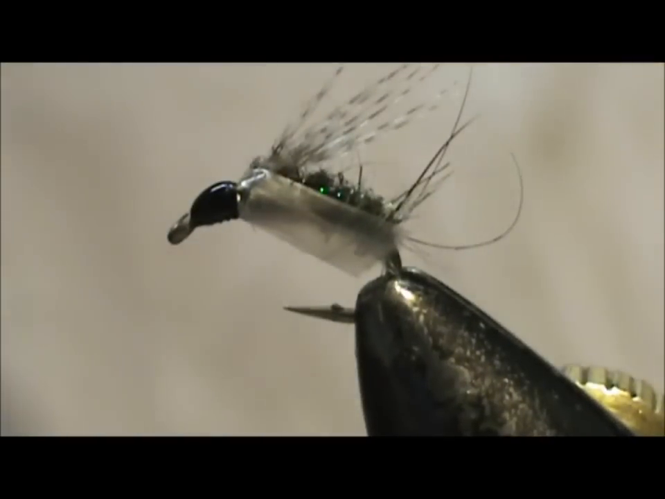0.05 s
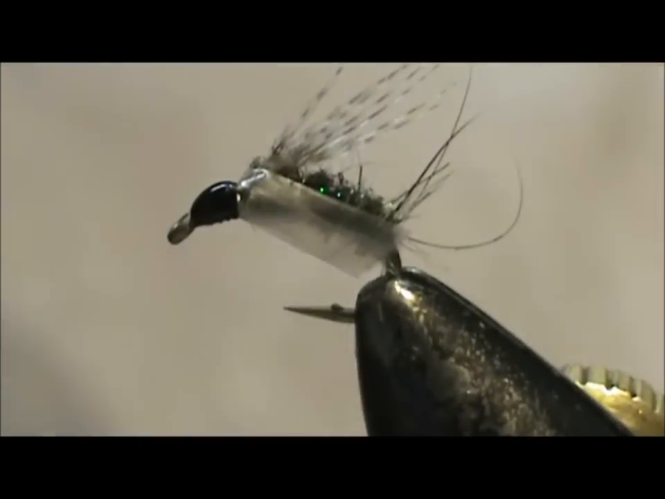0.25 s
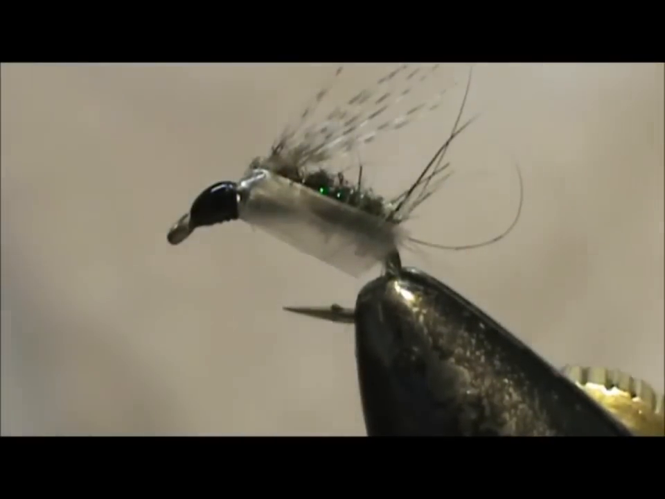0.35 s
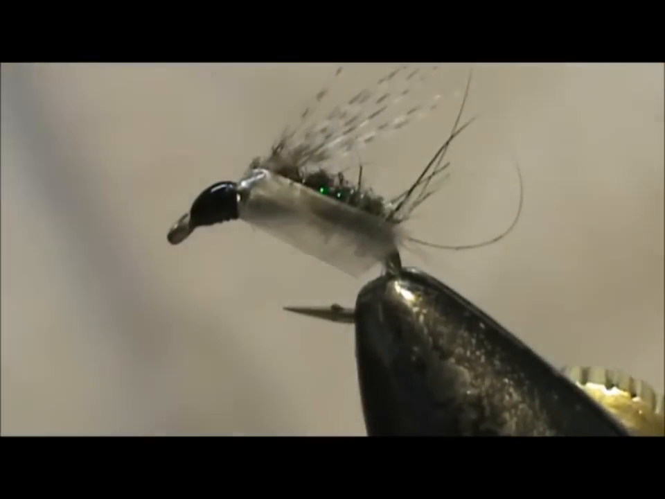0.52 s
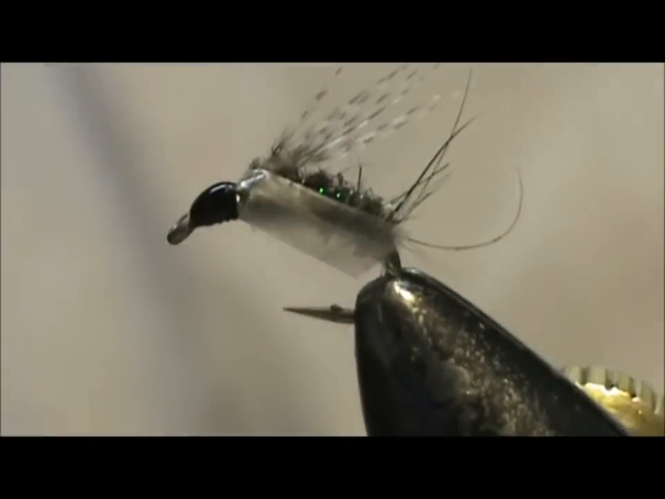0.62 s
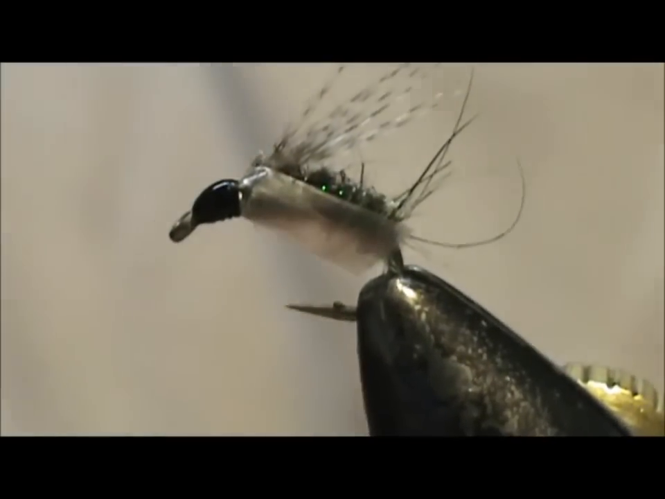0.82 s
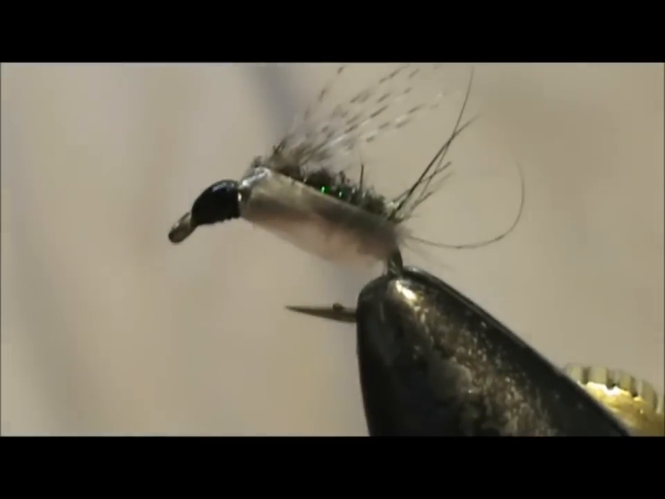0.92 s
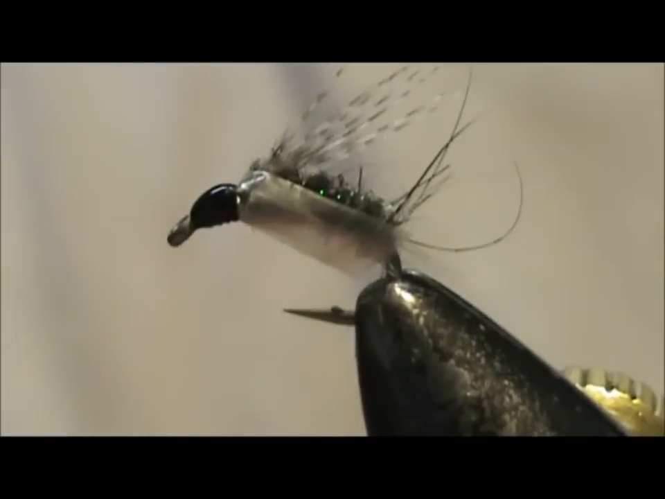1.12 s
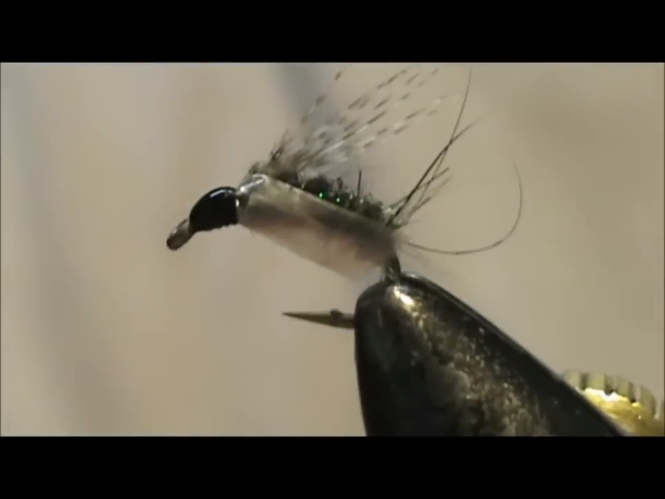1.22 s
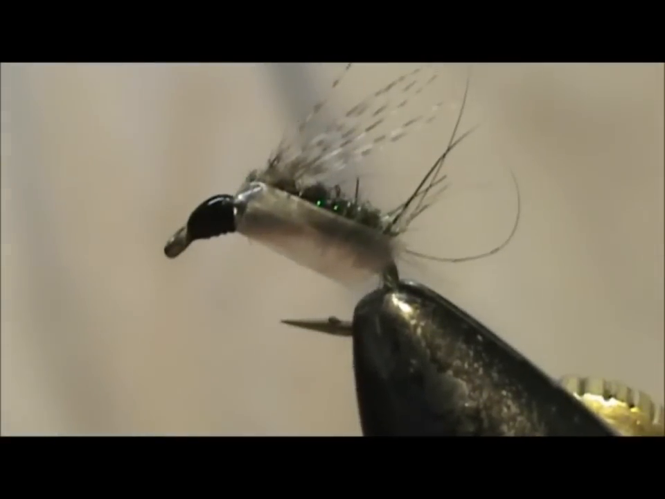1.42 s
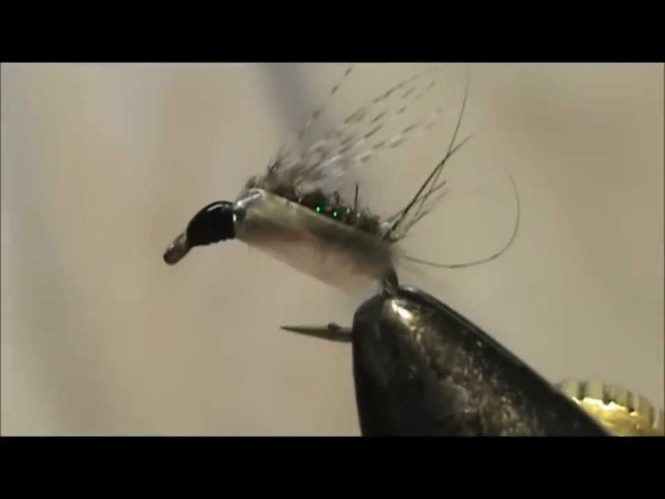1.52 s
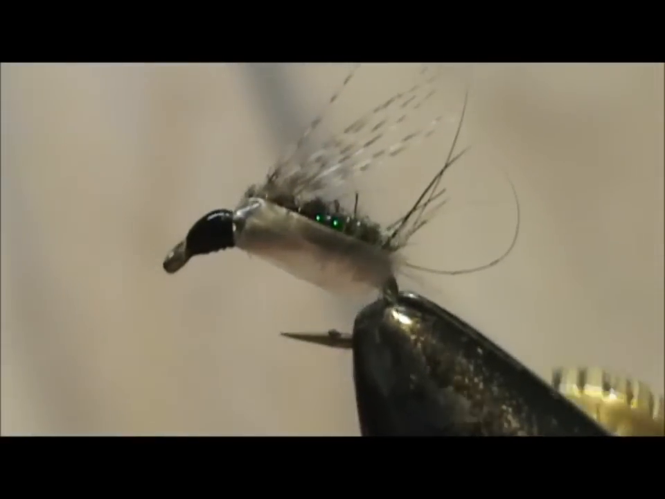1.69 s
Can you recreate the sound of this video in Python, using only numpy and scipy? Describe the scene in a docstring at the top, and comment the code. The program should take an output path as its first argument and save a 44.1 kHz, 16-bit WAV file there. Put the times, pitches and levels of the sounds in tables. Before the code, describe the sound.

One sharp metallic snap follows a light click in a quiet, faintly humming room.

```python
"""A small, quiet room with a motor hum: close-up work at a fly-tying vise.
A small tool clicks once (a tick and damped modes), then snaps: four sharp noise cracks run
into a short rattle of dense contacts and ringing metal. Later a hand rubs softly on the bench
and ends in one dull knock with a small rebound. Click, snap and knock each leave a room tail."""
import sys
import numpy as np
from scipy import signal
from scipy.fft import rfft, irfft
from scipy.io import wavfile
from scipy.ndimage import uniform_filter1d

SR = 44100
rng = np.random.default_rng(int(sys.argv[2]) if len(sys.argv) > 2 else 0)


def to_wav(sig):
    """Store sig (one row per channel, or 1-D mono) as 16-bit WAV at the path in sys.argv[1].

    Samples outside -1..1 are clipped; the rate is SR.
    """
    pcm = np.clip(np.atleast_2d(sig), -1, 1) * 32767
    pcm = np.round(pcm).astype(np.int16)
    wavfile.write(sys.argv[1], SR, pcm.T)  # frames by channels


N = 77175
T, HZ = np.arange(N) / SR, np.fft.rfftfreq(N, 1 / SR)
EDGE_HZ = 15200

# motor partials [f/Hz, rms level/dB]
HUM_PARTIALS = [(61.2, -49.5), (91.9, -60), (122.6, -53), (153.2, -54), (183.5, -63.5)]
# hand shifts [t/s, length/s, level/dB]
HAND_SHIFTS = [(1.236, 0.081, -44.5), (1.318, 0.094, -45.5), (1.391, 0.087, -41.5)]
# faint brushes, bumps, ticks, brief tool rings [t/s, length/s, level/dB, centre f/Hz, width/oct]
HANDLING_SOUNDS = [(0.084, 0.059, -50.5, 12000, 1), (0.3, 0.05, -50.5, 2120, 0.092),
                   (.5, 0.069, -53, 326, 0.054), (0.637, 0.043, -57, 274, 0.12),
                   (0.874, .24, -60, 356, 0.17), (0.939, .06, -51, 65, .3), (0.95, 0.048, -45.5, 346, 0.11),
                   (.944, .005, -51, 8000, 0.56), (0.984, 0.04, -55.5, 8500, 0.45),
                   (1.213, 0.0096, -54.5, 2440, 0.85), (1.239, 0.0058, -53, 7000, .7),
                   (1.288, 0.039, -46, 208, 0.19), (1.546, 0.0045, -53.5, 2150, 0.068)]
# knock and rebound [t/s, level/dB]
KNOCK_BLOWS = [(1.4452, -24), (1.4612, -38)]
# cracks of the snap [t/s, level/dB, decay/s, tilt/(dB/oct)]
CRACK_BURSTS = [(.3813, -3, .0006, 2.0), (.3934, -11, .0015, 1.3), (.3983, -11, .0006, .3),
                (.4060, -12, .0012, -.8)]

# modes [f/Hz, relative level/dB, t60/s]
KNOCK_BODY_MODES = [(384, -15, 0.12), (776, 0, 0.053), (1158, 3, 0.023), (1410, -2, 0.02), (1656, -5, .022),
                    (2100, -13, 0.021)]
CLICK_BODY_MODES = [(430, -24, .016), (810, -24, .02), (1130, -22, .018), (1485, -12, .02),
                    (1968, -8, .022), (2135, -4.5, .02), (2340, -10, .014), (3665, -2, .015),
                    (4170, -5, .014), (5650, -9, .007), (7980, -14, .008), (10150, -13, .005),
                    (12850, -22, .016)]
TOOL_MODES = [(2000, -43, 0.2), (2300, -52, .14), (3440, -43, 0.15), (3600, -46, 0.092)]
METAL_MODES = [(310, -4, .2), (1150, 0, .1), (1847, -1, .18), (1997, -1, .19), (2108, 0, .17),
               (2218, 2, .2), (3275, -3, .25), (3565, -5, .23), (4254, -3, .18), (4467, -5, .18),
               (4699, -4, .18), (5068, -6, .2), (7233, -7, .18), (8629, -7, .16)]

# source spectra [f/Hz, relative level/dB]
HISS_SPECTRUM = [(20, -29), (45, -6), (70, -22.5), (130, -19.5), (200, -10), (310, -22.5), (500, -20.5),
                 (1000, -24), (1900, -24), (2600, -26.5), (5000, -30), (10000, -32), (15000, -32.5)]
RUB_SPECTRUM = [(60, -10.5), (120, 3.5), (210, 3.5), (300, -1), (420, -4.5), (750, -7), (1100, -18),
                (2000, -29.5), (4000, -35.5), (14000, -31)]
TICK_SPECTRUM = [(150, -20), (600, -9), (1000, 2.5), (2000, 2.5), (4500, 5), (7000, -18), (9000, 1.5),
                 (11500, -4.5), (13500, -18)]
RATTLE_SPECTRUM = [(100, -18), (200, -21), (310, 4), (410, -16.5), (510, 7), (620, -23), (790, 5),
                   (970, -9), (1150, 4), (1400, 2.5), (1650, -2), (1880, 8.5), (2220, 4.5), (2600, 0),
                   (3300, 2.5), (4400, -3), (6000, -3), (8400, -4.5), (11200, -11), (12100, -18),
                   (12900, 3.5), (13600, -44)]
CRACK_SPECTRUM = [(100, -15), (300, -1), (620, 14.5), (1000, 7), (1600, 10.5), (2150, 7), (2900, -2),
                  (4300, 10), (6000, -11), (8000, 8), (11500, 8.5), (13000, -9), (14000, -40)]
# room and bench reflection spectra [f/Hz, relative level/dB]
KNOCK_ROOM_SPECTRUM = [(100, -7), (230, 2.5), (750, 0), (1000, -4), (1350, -3), (2000, -14), (3000, -30),
                       (14000, -28)]
CLICK_ROOM_SPECTRUM = [(150, -9.5), (330, -3.5), (620, -18), (1000, -22.5), (1500, -5.5), (1800, -2),
                       (2080, 6.5), (2450, -4), (2830, -4), (3400, 0.5), (4100, -5), (4650, -10.5),
                       (5400, -9.5), (7000, -22), (10500, -22), (13500, -54.5)]
SNAP_ROOM_SPECTRUM = [(100, -14), (310, -10.5), (450, -6.5), (780, -3.5), (970, -11.5), (1200, -3.5),
                      (1650, -0.5), (2150, 6), (2700, 2), (3400, 1), (5200, -4), (8000, -7.5),
                      (11000, -9.5), (12100, -22), (12900, -11), (13600, -53)]
BENCH_SPECTRUM = [(100, -16), (300, 2), (620, -3), (980, -5), (1150, 5), (1650, -11), (2150, 6.5),
                  (2800, -8), (4300, 4), (5700, -8.5), (8000, 7), (11000, -14), (12100, -13), (12900, 10),
                  (13600, -26)]
# room decay [f/Hz, t60/s]
ROOM_DECAY = [(150, 0.62), (500, 0.27), (1000, 0.31), (2100, 0.25), (4000, 0.31), (8000, 0.27),
              (13000, 0.32)]

# left-right coherence [f/Hz, coherence/1]
HISS_COHERENCE = [(50, 0.48), (200, 0.54), (500, 0.48), (1500, 0.18), (4000, 0.59), (8000, 0.99),
                  (14000, 0.97)]
NEAR_COHERENCE = [(200, 0.95), (700, 0.94), (2000, 0.66), (5000, 0.87), (9000, 0.87), (14000, 0.92)]
ROOM_COHERENCE = [(200, 0.98), (700, 0.78), (2000, 0.36), (5000, 0.86), (10000, 0.8)]
CRACK_COHERENCE = [(200, 0.9), (700, .92), (2000, .75), (5000, 0.62), (9000, 1), (14000, 0.89)]
BENCH_COHERENCE = [(200, 0.98), (700, 0.99), (2000, .5), (5000, 1), (9000, 1), (14000, 0.83)]
# microphone ports, left against right [f/Hz, phase lead/rad, level/dB]
MIC_PORTS = [(60, -0.3, 3), (400, -0.57, 0), (910, -0.96, 0), (1980, -0.68, 3.5), (4500, -0.34, 1),
             (9000, -0.18, 1), (14000, 0.18, .2)]


def amp(db):
    """Decibels to gain."""
    return 10 ** (np.asarray(db) / 20)


def unit(x):
    """Scale to rms 1."""
    return x / np.sqrt(np.mean(x ** 2) + 1e-20)


def lookup(table, hz, col=1):
    """Interpolate a column over log frequency."""
    points = np.array(table, float)
    return np.interp(np.log(hz + 1), np.log(points[:, 0] + 1), points[:, col])


def since(start_s):
    """Seconds since start_s, zero before."""
    return np.maximum(T - start_s, 0)


def ramp(start_s, rise_s):
    """Linear rise from 0 to 1, then held."""
    return np.minimum(since(start_s) / rise_s, 1)


def fall(start_s, decay_s):
    """1 until start_s, then exponential decay."""
    return np.exp(-since(start_s) / decay_s)


def stroke(start_s, length_s, exponent):
    """Arch of pressure."""
    return np.maximum(np.sin(np.pi * ramp(start_s, length_s)), 0) ** exponent


def drift(rate_hz):
    """Slow random wander, rms 1."""
    return unit(irfft(rfft(rng.standard_normal(N)) * np.exp(-(HZ / rate_hz) ** 2), N))


def colour(x, spectrum, size=4096):
    """Minimum-phase filter of unit energy."""
    log_gain = np.log(amp(lookup(spectrum, abs(np.fft.fftfreq(size, 1 / SR)))))
    taps = np.fft.ifft(np.exp(np.conj(signal.hilbert(log_gain)))).real[:size // 2]
    return signal.fftconvolve(x, taps[None] / np.linalg.norm(taps), axes=1)[:, :N]


def stereo_noise(coherence, raw=None):
    """White noise, or a raw pair, mixed to the given coherence; rms 1."""
    a, b = rfft(rng.standard_normal((2, N)) if raw is None else raw)
    alike = np.clip(lookup(coherence, HZ), 0, 1)
    mid, side = a * np.sqrt(1 + alike), b * np.sqrt(1 - alike)
    return unit(irfft([mid + side, mid - side], N))


def ring(start_s, modes, scatter_cycles=0):
    """Struck modes: damped sines of alternating sign, optional phase scatter."""
    t, out = since(start_s), 0
    for k, (hz, db, t60_s) in enumerate(modes):
        phase_rad = 2 * np.pi * (hz * t + scatter_cycles * rng.random()) + k * np.pi
        out += amp(db - 60 * t / t60_s) * np.sin(phase_rad)
    return (t > 0) * out


def room_tail(start_s, spectrum, rise_s):
    """Diffuse tail of a hit; each band decays at its own rate."""
    hz, t, bands = signal.stft(stereo_noise(ROOM_COHERENCE), SR, nperseg=256)
    bands *= amp(-60 * np.maximum(t - start_s, 0) / lookup(ROOM_DECAY, hz)[:, None])
    tail = signal.istft(bands, SR, nperseg=256)[1][:, :N]
    return colour(tail * ramp(start_s, rise_s), spectrum)


def hiss(level_db=-53.5):
    """Steady noise floor, strongest in the bass."""
    shaped = rfft(stereo_noise(HISS_COHERENCE)) * amp(lookup(HISS_SPECTRUM, HZ))
    return amp(level_db) * unit(irfft(shaped, N))


def motor_hum(waver_db=0.7, waver_rad=0.06):
    """Low partials, wavering slightly in level and phase."""
    out = 0
    for hz, db in HUM_PARTIALS:
        peak = np.sqrt(2) * amp(db + waver_db * drift(rate_hz=12))
        out += peak * np.sin(2 * np.pi * (hz * T + rng.random()) + waver_rad * drift(rate_hz=2.7))
    return out


def faint_handling():
    """Brushes, soft bumps, tiny ticks and brief tool rings: one arch of band noise each."""
    out = 0
    for start_s, length_s, db, centre_hz, width_oct in HANDLING_SOUNDS:
        band = np.exp(-0.5 * (np.log2((HZ + 1) / centre_hz) / width_oct) ** 2) * (HZ < EDGE_HZ)
        noise = unit(irfft(rfft(stereo_noise(NEAR_COHERENCE)) * band, N))
        out += amp(db) * stroke(start_s, length_s, exponent=0.43) * noise
    return out


def hand_rub(lump_db=1.5):
    """Hand shifting on the bench: low, lumpy friction noise."""
    lumps = unit(amp(lump_db * unit(uniform_filter1d(rng.standard_normal(N), size=400))))
    pressure = sum(amp(db) * stroke(start_s, length_s, exponent=0.61)
                   for start_s, length_s, db in HAND_SHIFTS)
    return colour(stereo_noise(NEAR_COHERENCE) * lumps * pressure, RUB_SPECTRUM)


def knock(push_s=0.0042, room_db=-42):
    """A soft blow and its rebound drive a few low modes; the room answers."""
    body = sum(amp(db) * ramp(start_s, push_s) * ring(start_s, KNOCK_BODY_MODES)
               for start_s, db in KNOCK_BLOWS)
    return body + amp(room_db) * room_tail(KNOCK_BLOWS[0][0], KNOCK_ROOM_SPECTRUM, rise_s=0.0033)


def tool_click(start_s=0.2193, echo_delay_s=0.006):
    """Hard tick, quickly damped modes, faint ring, bench echo and room tail."""
    tick = stereo_noise(NEAR_COHERENCE) * (T > start_s) * fall(start_s, decay_s=0.00061)
    tick = amp(-19) * colour(tick, TICK_SPECTRUM)
    echo_s = start_s + echo_delay_s
    echo = stereo_noise(ROOM_COHERENCE) * (T > echo_s) * fall(echo_s, decay_s=0.007)
    echo = amp(-30) * colour(echo, CLICK_ROOM_SPECTRUM)
    body = amp(-13.5) * ring(start_s, CLICK_BODY_MODES) + ring(start_s, TOOL_MODES)
    tail = amp(-34) * room_tail(start_s, CLICK_ROOM_SPECTRUM, rise_s=0.0017)
    return tick + body + echo + tail


def rattle(start_s=0.3935, rise_s=0.012, hold_s=0.011, decay_s=0.015, contacts_per_s=14000):
    """Short swell of dense random contacts."""
    contacts = rng.standard_normal((2, N)) * (rng.random((2, N)) < contacts_per_s / SR)
    swell = np.sqrt(ramp(start_s, rise_s)) * fall(start_s + rise_s + hold_s, decay_s)
    return colour(stereo_noise(NEAR_COHERENCE, contacts) * swell, RATTLE_SPECTRUM)


def metal_ring(start_s=0.407):
    """The snapped metal rings on in its modes."""
    return ring(start_s, METAL_MODES, scatter_cycles=0.87) * ramp(start_s, rise_s=0.003)


def cracks(rise_s=0.00047, bench_decay_s=0.011, bench_db=-17.5):
    """Very short bursts, each with its own brightness, and their reflections off the bench."""
    direct, bench_power = 0, 0
    for start_s, db, decay_s, tilt_db_per_oct in CRACK_BURSTS:
        onset = amp(db) * ramp(start_s, rise_s)
        spectrum = [(hz, band_db + tilt_db_per_oct * np.log2(hz)) for hz, band_db in CRACK_SPECTRUM]
        direct += colour(stereo_noise(CRACK_COHERENCE) * onset * fall(start_s, decay_s), spectrum)
        bench_power += (onset * fall(start_s, bench_decay_s)) ** 2
    reflections = colour(stereo_noise(BENCH_COHERENCE) * np.sqrt(bench_power), BENCH_SPECTRUM)
    return direct + amp(bench_db) * reflections


def tool_snap(tail_start_s=0.4056):
    """Cracks run into a rattle, ringing metal and the room tail."""
    near = amp(-18.5) * rattle() + amp(-29.5) * metal_ring() + cracks()
    return near + amp(-18.5) * room_tail(tail_start_s, SNAP_ROOM_SPECTRUM, rise_s=0.016)


def scene():
    """Bench sounds reach two microphone ports slightly apart, over hum and hiss."""
    bench = tool_click() + tool_snap() + knock() + hand_rub() + faint_handling()
    left_gain = amp(lookup(MIC_PORTS, HZ, col=2) / 2) * np.exp(0.5j * lookup(MIC_PORTS, HZ))
    at_ports = irfft(rfft(bench) * np.array([left_gain, 1 / left_gain]), N)
    return at_ports + motor_hum() + hiss()


def record(dry):
    """Low-pass at EDGE_HZ."""
    taps = signal.firwin(511, EDGE_HZ, window=("kaiser", 9), fs=SR)
    return signal.oaconvolve(dry, taps[None], "same")


dry = scene()
out = record(dry)
to_wav(out)
```